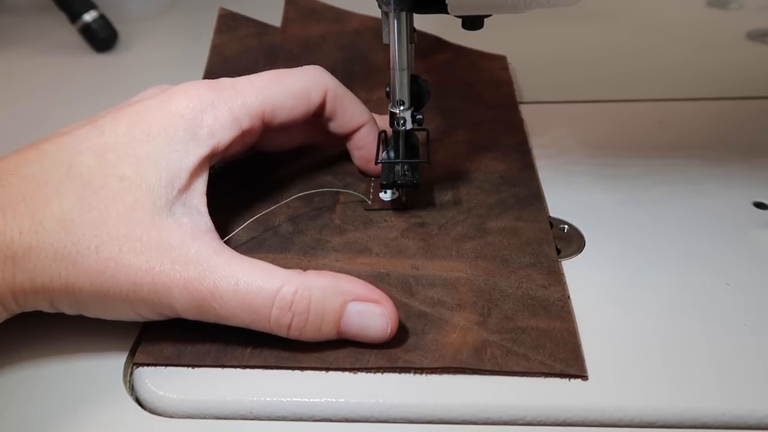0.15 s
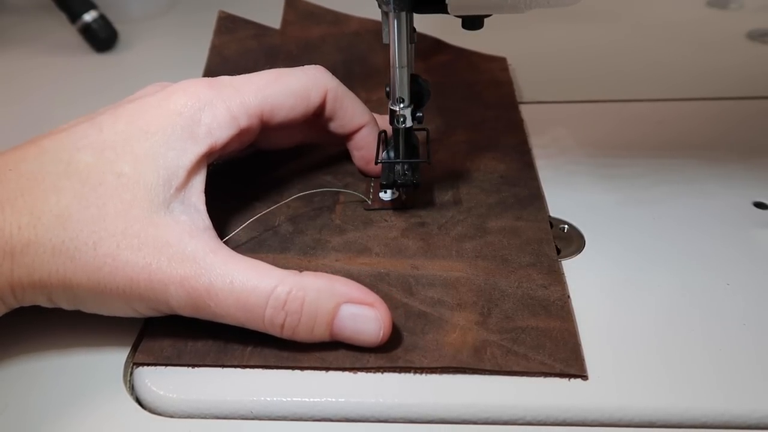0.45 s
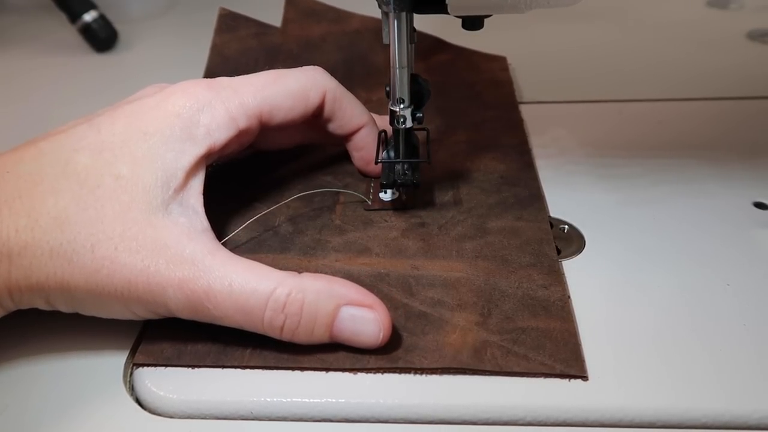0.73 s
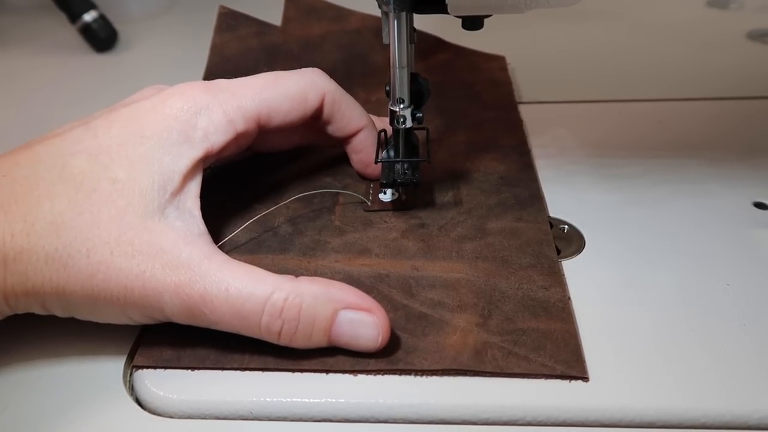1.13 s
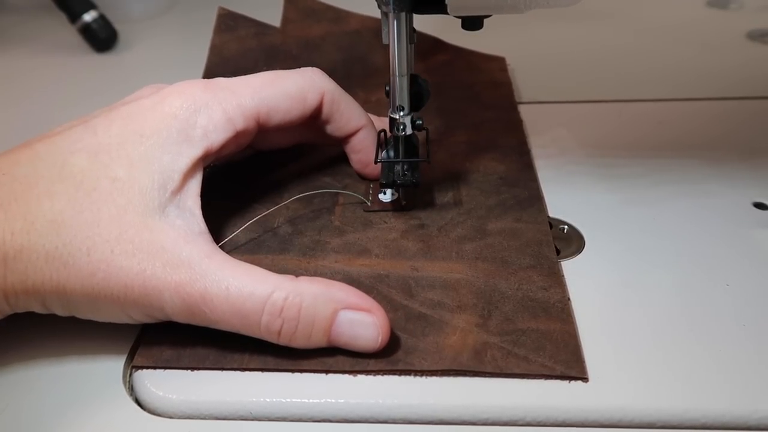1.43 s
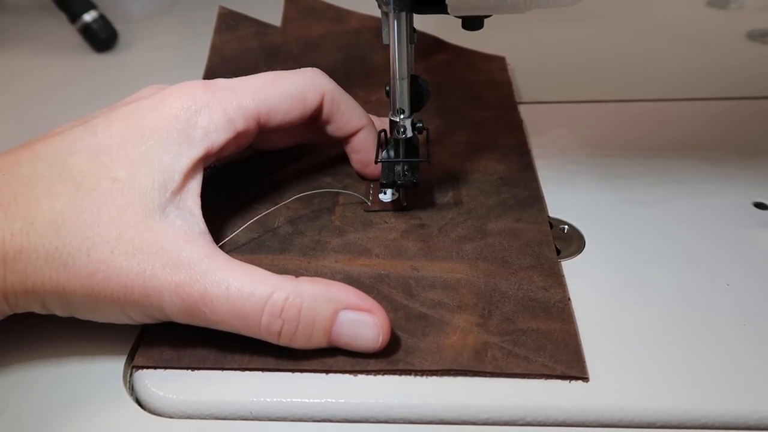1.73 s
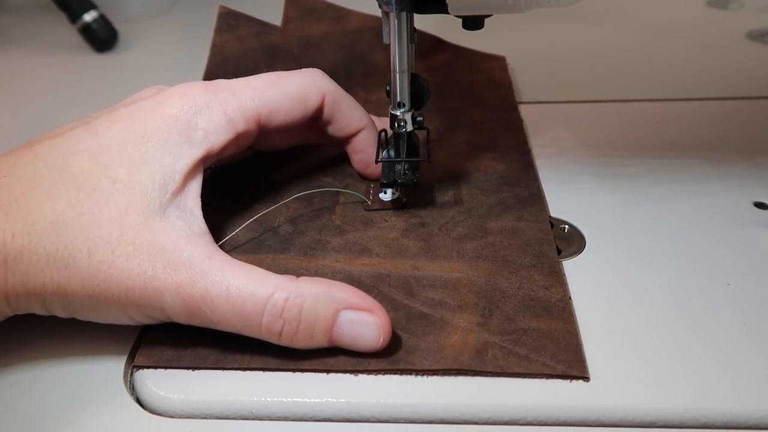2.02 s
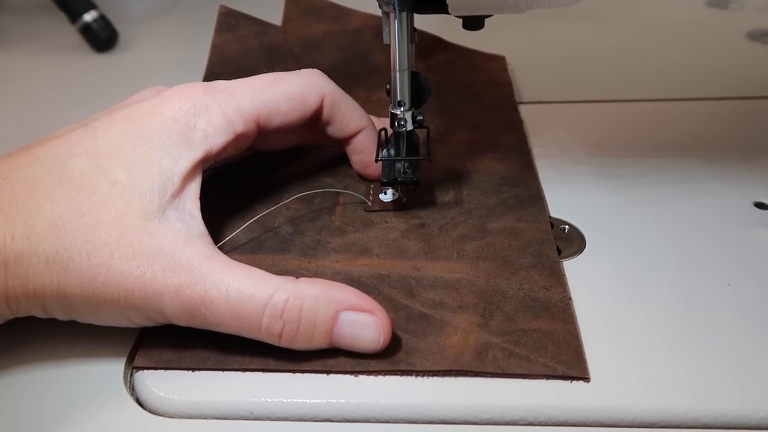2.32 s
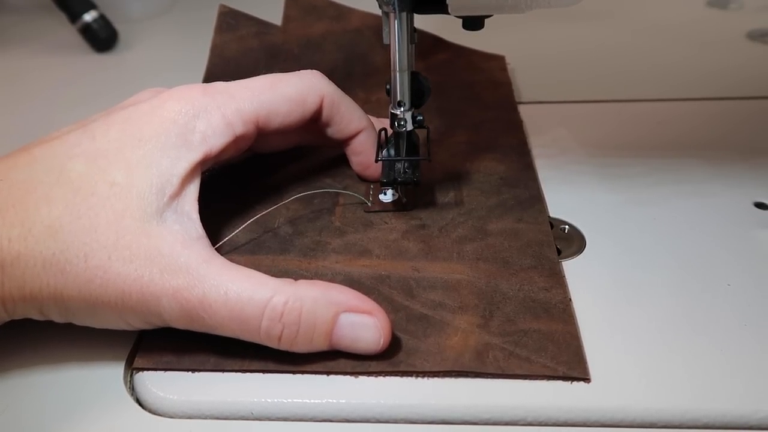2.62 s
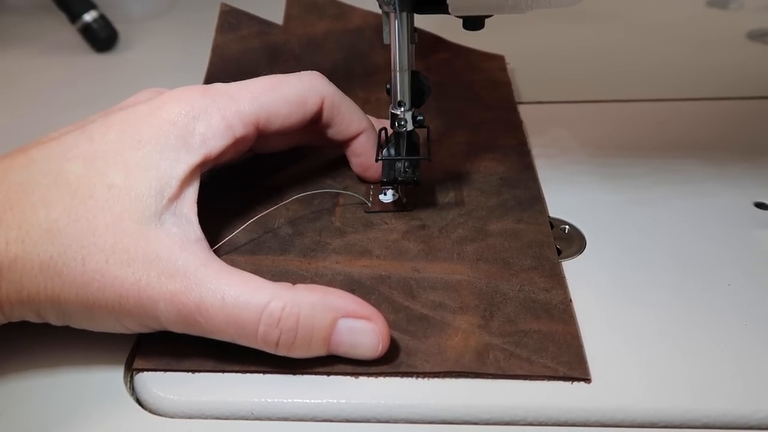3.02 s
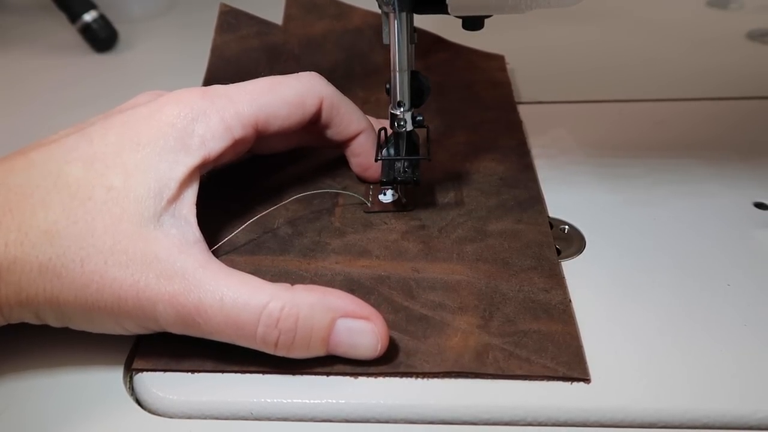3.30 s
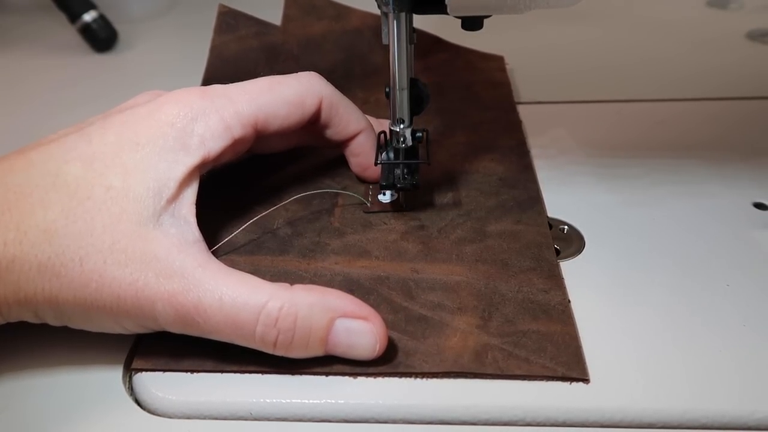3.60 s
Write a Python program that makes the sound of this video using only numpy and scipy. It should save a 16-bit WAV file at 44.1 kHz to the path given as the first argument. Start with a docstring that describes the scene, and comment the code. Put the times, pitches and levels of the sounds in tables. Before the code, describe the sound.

A sewing machine inches through leather with metallic ticks, dull knocks and a creak, motor starting at the end

```python
"""A small room, where an industrial sewing machine inches through leather on its table.
The drive nudges in short knocks, the linkage ticks, the needle bar and foot clunk, and a joint creaks and slips.
Every blow is a click played through colored pulses, decaying modes and noise tails; rubbing is shaped noise.
At the end the motor swells into a steady tone with rough friction. A faint hum and rumble lie underneath."""
import sys
import numpy as np
from scipy import signal
from scipy.fft import rfft, irfft
from scipy.io import wavfile

SR = 44100
rng = np.random.default_rng(int(sys.argv[2]) if len(sys.argv) > 2 else 0)


def put_to_file(sound):
    """Save the sound as 16-bit audio at rate SR, in the file named by the first command-line argument."""
    columns = np.atleast_2d(sound).T  # one column per channel
    safe = np.clip(columns, -1, 1)
    whole_steps = np.round(safe * 32767)
    wavfile.write(sys.argv[1], SR, whole_steps.astype(np.int16))


N = 165375
T = np.arange(N) / SR

# Ring of the links, struck by ticks and rubbed by the feed.
# Each row: frequency in Hz, level in dB, decay time t60 in seconds.
LINK_MODES = [(2670, -15, 0.025), (3600, -32.5, 0.34), (7960, -30, 0.047)]


def amp(db):
    """Decibels to gain."""
    return 10 ** (np.asarray(db) / 20)


def clicks(times, db):
    """Single-sample blows at the given times in seconds."""
    out = np.zeros(N)
    index = np.clip(np.round(np.asarray(times) * SR).astype(int), 0, N - 1)
    np.add.at(out, index, amp(db))
    return out


def through(x, response):
    """Play a signal through an impulse response."""
    return signal.fftconvolve(x, response)[:N]


def low_pass(x, hz):
    """Gentle second-order low-pass."""
    sections = signal.butter(2, min(hz, SR / 2 - 1), fs=SR, output="sos")
    return signal.sosfilt(sections, x + 1e-18)  # the offset avoids denormals


def decay(t60, samples=SR):
    """Exponential fade that loses 60 dB in t60 seconds."""
    return np.exp(-np.log(1000) * T[:samples] / t60)


def ring(modes):
    """Response of decaying modes (Hz, dB, t60), alternating in sign."""
    out = np.zeros(SR)
    for k, (hz, db, t60) in enumerate(modes):
        out += (-1) ** k * amp(db) * decay(t60) * np.sin(2 * np.pi * hz * T[:SR])
    return out


def impact(spectrum, size=4096):
    """Minimum-phase pulse of a given color (Hz, dB), thinned below its first frequency, peak 1."""
    hz, db = np.transpose(spectrum)
    f = np.arange(size // 2 + 1) * SR / size + 1
    color = amp(np.interp(np.log(f), np.log(hz), db))
    bass_cut = f / np.hypot(f, hz[0])
    # Keeping only the first half of the cepstrum packs the energy at the start.
    cepstrum = irfft(np.log(color * bass_cut))
    cepstrum[size // 2:] = 0
    pulse = irfft(np.exp(2 * rfft(cepstrum)))
    return pulse / np.abs(pulse).max()


def tail(t60, db):
    """Dense dying ring of casting and room: noise with a soft onset and energy db."""
    noise = rng.standard_normal(SR) * decay(t60) * (1 - np.exp(-T[:SR] / 0.0017))
    return amp(db) * noise / np.sqrt(np.sum(noise ** 2))


def contact(x, spectrum, t60, tail_db):
    """Blows heard as a short crack and its duller, diffuse tail."""
    direct = through(x, impact(spectrum))
    diffuse = through(direct, tail(t60, tail_db))
    return direct + low_pass(diffuse, hz=6000)


def grit(blows, t60, db):
    """Each blow crumbles into its own short burst of micro-contacts, with energy db."""
    envelope = decay(t60, SR // 4)
    burst = through(blows, envelope / np.sqrt(np.sum(envelope ** 2)))
    return amp(db) * rng.standard_normal(N) * burst


def background():
    """Colored noise for room rumble and hiss, a faint wavering hum, and a ring dying away from the outset."""
    # Color of the room noise. Each row: frequency in Hz, relative level in dB.
    floor_color = [(20, 5), (45, -5), (80, -12), (150, -17.5), (250, -17.5), (350, -21.5), (600, -30),
                   (1200, -33), (4000, -36.5), (8000, -39), (15500, -39.5)]
    # Hum partials. Each row: frequency in Hz, mean level in dB.
    hum_partials = [(59.5, -66.5), (135, -76.5)]
    # Ring at the outset. Each row: frequency in Hz, level in dB, decay time t60 in seconds.
    after_ring = [(135, -66, .8), (608, -69, .8)]
    floor_db, hum_waver_db = -63, 2.5

    # An extra second lets the filter settle before the part that is kept.
    noise = signal.fftconvolve(rng.standard_normal(N + SR), impact(floor_color, size=16384))[SR:SR + N]
    room = amp(floor_db) * noise / noise.std()
    waver = np.interp(T, np.linspace(0, T[-1], 20), rng.standard_normal(20))
    hum = sum(amp(db) * np.sin(2 * np.pi * hz * T) for hz, db in hum_partials)
    return room + hum * amp(hum_waver_db * waver) + through(clicks([0], [0]), ring(after_ring))


def thuds():
    """Soft, low bumps of the table: dulled clicks ring its low modes."""
    # Bumps. Each row: time in seconds, blow level in dB.
    bumps = [(1.551, -43.5), (2.222, -45), (2.619, -45), (2.783, -47), (3.325, -48.5)]
    # Their ring. Each row: frequency in Hz, level in dB, decay time t60 in seconds.
    thud_modes = [(38.7, 1, .16), (73, 2, 0.046), (101, -7.5, 0.086), (131, -8.5, 0.23)]
    return through(low_pass(clicks(*np.transpose(bumps)), hz=175), ring(thud_modes))


def rubbing():
    """Faint, uneven friction that swells and fades with each movement of the feed and keeps the links ringing."""
    # Leather and thread rub as the feed moves. Each row: start in seconds, length in seconds, peak level in dB.
    rubs = [(0.206, 0.42, -70.5), (1.36, 0.34, -67), (2.059, 0.16, -65.5), (2.558, 0.34, -79),
            (3.451, 0.43, -63.5)]
    # Color of the rubbing. Each row: frequency in Hz, relative level in dB.
    rub_color = [(250, 6.5), (600, 1.5), (1100, -6.5), (2600, -12), (3200, -5.5), (3650, -5), (4300, -14),
                 (8000, -20), (16000, -25)]
    rough_db, ring_db = 0.5, -9.5

    level = np.zeros(N)
    for start, length, db in rubs:
        progress = np.clip((T - start) / length, 0, 1)
        level += amp(db) * np.sqrt(np.abs(np.sin(np.pi * progress)))
    noise = through(rng.standard_normal(N), impact(rub_color))
    rough = low_pass(rng.standard_normal(N), hz=89.5)
    rub = level * amp(rough_db * rough / rough.std()) * noise / noise.std()
    return rub + amp(ring_db) * through(rub, ring(LINK_MODES))


def ticks():
    """Play in the linkage is taken up in small metallic ticks, and once in a bright snap."""
    # Linkage ticks. Each row: time in seconds, blow level in dB, high ping blow in dB.
    tick_events = [(0.208, -56.5, -70), (.219, -52.5, -75), (0.265, -51.5, -76), (0.292, -49, -75),
                   (.314, -48.5, -56.5), (0.3834, -51.5, -82), (0.4098, -48, -63), (0.474, -46.5, -76),
                   (0.484, -48, -53), (0.498, -43, -55), (1.377, -59.5, -83), (1.4467, -46.5, -79),
                   (1.525, -41.5, -75), (2.067, -49.5, -96), (2.913, -52, -87), (2.953, -51.5, -87),
                   (3.417, -47, -62), (3.4696, -46, -67), (3.601, -41, -59)]
    # Color of a tick. Each row: frequency in Hz, relative level in dB.
    tick_color = [(200, 5), (600, 5), (1100, -8), (1600, -0.5), (2100, -6), (2650, 7), (3150, -6),
                  (3700, 3), (4200, -8), (4900, -4.5), (5800, -13.5), (9000, -30.5), (16000, -32)]
    # Ring of a small spring. Each row: frequency in Hz, level in dB, decay time t60 in seconds.
    spring_modes = [(3690, -5.5, 0.1), (6270, -16.5, 0.073), (6620, -3.5, 0.023), (8440, -21, 0.054)]
    # Ring of the metal snap. Each row: frequency in Hz, level in dB, decay time t60 in seconds.
    snap_modes = [(5290, -1.5, 0.015), (9000, -11, 0.013), (10360, -8, 0.013), (11450, -15.5, 0.038),
                  (12700, -16, 0.014), (15600, -8, 0.015)]

    s, db, ping_db = np.transpose(tick_events)
    blows = clicks(s, db)
    body = contact(grit(blows, t60=0.022, db=6.5), tick_color, t60=0.2, tail_db=-1.5)
    links = through(blows, ring(LINK_MODES))
    pings = through(clicks(s, ping_db), ring(spring_modes))
    snap = clicks([3.593], [-42])
    snap = snap + grit(snap, t60=0.047, db=-2.0)
    return body + links + pings + through(snap, ring(snap_modes))


def creak():
    """A short run of uneven, gritty slips rings the metalwork; duller single slips come at other times."""
    # Single slips of the joint. Each row: time in seconds, rasp blow in dB, brightness in Hz, ring blow in dB.
    single_slips = [(.301, -46, 1400, -66), (.309, -51.5, 1400, -69), (2.187, -45, 950, -59),
                    (2.197, -44, 846, -56), (2.219, -43, 650, -61), (3.527, -51, 1600, -48),
                    (3.5456, -44.5, 1800, -44.5), (3.554, -46, 1490, -47)]
    # Metalwork. Each row: frequency in Hz, level in dB, decay time t60 in seconds.
    creak_modes = [(313, -7, 0.3), (477, -6, 0.28), (686, -10, 0.32), (780, -9.5, 0.15), (979, -8, 0.29),
                   (1192, -2.5, 0.2), (1281, 1, 0.14), (1680, -3, 0.062), (1845, -7.5, 0.042),
                   (2310, -4, 0.08), (3800, -18, 0.039), (4170, -9, 0.083), (4890, -11, 0.069)]
    # Color of the rasp. Each row: frequency in Hz, relative level in dB.
    rasp_color = [(120, 10), (600, 0), (1300, -2.5), (1900, -7), (2550, -13), (3600, -3.5), (4900, -15.5),
                  (5800, -23), (7200, -18.5), (10000, -38)]
    start_s, length_s, blow_db = 1.6165, .094, -47.5
    slips_per_s, jitter_periods, spread_db = 93, .05, 0.5
    crack_db, rasp_db, rasp_t60 = 4, 10, 0.039

    after = (np.arange(20) + jitter_periods * rng.standard_normal(20)) / slips_per_s
    # The first slips are up to 3 dB softer.
    strengths = blow_db - 3 * np.exp(-after / 0.022) + spread_db * rng.standard_normal(20)
    slipping = after < length_s
    slips = clicks(start_s + after[slipping], strengths[slipping])
    rasp = amp(crack_db) * slips + grit(slips, rasp_t60, rasp_db)
    for s, db, bright_hz, ring_db in single_slips:
        slips = slips + low_pass(clicks([s], [ring_db]), bright_hz)
        rasp = rasp + low_pass(grit(clicks([s], [db]), rasp_t60, rasp_db), bright_hz)
    return through(slips, ring(creak_modes)) * amp(-5.5) + contact(rasp, rasp_color, t60=0.25, tail_db=-3)


def clunks():
    """A main blow rings the head while needle bar and foot chatter for a moment, then rattle to rest."""
    # Clunks. Each row: time in seconds, blow level in dB, chatter in seconds, brightness in Hz, head blow in dB.
    clunk_events = [(.502, -35, 0.019, 4400, -39), (1.4667, -36, 0.02, 4340, -41),
                    (2.081, -41.5, 0.018, 3900, -43), (3.536, -40, 0.019, 5150, -38.5)]
    # Color of the chatter. Each row: frequency in Hz, relative level in dB.
    chatter_color = [(90, 2), (170, 17.5), (300, 10), (500, 2), (1100, -9.5), (1450, -8.5), (1900, -1.5),
                     (2800, -7.5), (4000, -8.5), (6000, -19), (10000, -10.5), (16000, -54)]
    # Needle bar and foot. Each row: frequency in Hz, relative level in dB, decay time t60 in seconds.
    bar_modes = [(691, -5, 0.11), (913, -8.5, 0.13), (1098, -3.5, 0.047), (1279, -9, 0.081),
                 (1667, -6, 0.057), (1764, -4, 0.047), (2034, -18.5, 0.07), (2300, -5, 0.046),
                 (2720, -1.5, 0.032), (3070, -3.5, 0.033)]
    # Machine head. Each row: frequency in Hz, level in dB, decay time t60 in seconds.
    head_modes = [(112.6, -9, 0.32), (146, -3, .12), (174, -0.5, 0.13), (213, -14.5, 0.31),
                  (301, -24, 0.27), (352, -14.5, 0.37), (484, -18, 0.19), (564, -16, 0.36),
                  (684, -19.5, 0.21), (924, -16, 0.21)]
    contacts_per_s, first_blow_db, chatter_db = 400, 3.5, -1.5
    rattle_per_s, rattle_db, rattle_fade_db_per_s = 90, -10, 125

    chatter, blows = np.zeros((2, N))
    for s, db, length, bright_hz, head_db in clunk_events:
        wobble, size, sign, late = rng.random((4, 20))
        after = (np.arange(20) + wobble - wobble[0]) / contacts_per_s
        # Contacts vary by 3 dB either way and fade fast once the chatter length is over.
        fade_db = 60 * np.maximum(after / length - 1, 0)
        strengths = db + chatter_db + 6 * (size - .5) - fade_db
        strengths[0] = db + first_blow_db
        up = sign > .5  # contacts push either way at random
        run = clicks(s + after[up], strengths[up]) - clicks(s + after[~up], strengths[~up])
        settling = (np.arange(20) + late) / rattle_per_s
        rattle_levels = db + rattle_db - rattle_fade_db_per_s * settling
        run = run + clicks(s + length + settling, rattle_levels)
        chatter += low_pass(run, bright_hz)
        blows += clicks([s], [head_db])
    body = contact(chatter, chatter_color, t60=0.33, tail_db=-0.5)
    bar = amp(-14) * through(chatter, ring(bar_modes))
    return body + bar + through(blows, ring(head_modes))


def motor():
    """The motor swells into a steady sum of harmonics, with rough friction that throbs twice a cycle."""
    # Harmonics of the turning motor. Each row: multiple of the turning rate, relative level in dB.
    orders = [(1, 0), (2, -2), (3, -25), (4, -19), (5, -19), (6, -25), (7, -22)]
    # Color of the drive's gritty friction. Each row: frequency in Hz, relative level in dB.
    grind_color = [(150, 13.5), (450, 5), (750, 1.5), (1000, -4.5), (1600, -3), (2600, -2.5), (3700, -4.5),
                   (4500, -19), (6500, -29), (16000, -46)]
    start_s, rise_s, turn_hz = 3.657, .085, 116.5
    hum_db, hum_swell_db = -34.5, 15
    grind_db, grind_swell_db, throb_db = -46.5, 15.5, 2

    rise = np.minimum((T - start_s) / rise_s, 1)
    gate = np.clip(10 * rise, 0, 1)  # silent before the start, open after a tenth of the rise
    turn = 2 * np.pi * turn_hz * (T - start_s)
    hum = sum(amp(db) * np.cos(multiple * turn) for multiple, db in orders)
    hum = hum * amp(hum_db + hum_swell_db * (rise - 1))
    grind = through(rng.standard_normal(N), impact(grind_color))
    grind_level = amp(grind_db + grind_swell_db * (rise - 1) + throb_db * np.cos(2 * turn))
    return gate * (hum + grind / grind.std() * grind_level)


def knocks():
    """Each nudge of the drive cracks, rings briefly, booms in the table and rocks the stand."""
    # Drive knocks. Each row: time in seconds, crack blow in dB before the mix, table boom blow in dB.
    nudges = [(.791, -33.5, -46), (0.8154, -46.5, -46), (1.0726, -30, -42.5), (1.104, -39.5, -53.5),
              (2.2695, -32.5, -46), (2.3027, -38.5, -48), (2.3283, -37, -48.5), (2.349, -37.5, -44.5),
              (2.368, -33.5, -46.5), (2.388, -39, -44.5), (3.138, -26, -39.5), (3.1696, -33.5, -53.5),
              (3.601, -38.5, -50)]
    # Color of the crack. Each row: frequency in Hz, relative level in dB.
    crack_color = [(100, -1), (450, 0), (750, -5.5), (1100, -15), (1650, -3), (2250, -14), (2950, -6),
                   (3550, -11), (4300, -20.5), (5300, -31), (6700, -22.5), (9000, -38), (16000, -43)]
    # Metallic ring of the drive, the same in every knock.
    # Each row: frequency in Hz, relative level in dB, decay time t60 in seconds.
    drive_modes = [(1572, -20, 0.052), (1854, -16, 0.034), (2520, -24, 0.069), (2926, -11, 0.017),
                   (3545, -7, 0.019), (3850, -18, 0.034), (4180, -15, 0.013)]
    # Table and motor mount. Each row: frequency in Hz, level in dB, decay time t60 in seconds.
    table_modes = [(92.9, -9.5, 0.33), (118.5, -2, 0.2), (134.1, -11, 1), (206.4, 4, 0.24), (225, 0, 0.24),
                   (253.6, -11, 0.3), (312, -21, 0.08), (395.5, -17.5, 0.35), (477.5, -19.5, 0.32),
                   (562, -16, 0.23), (655, -12.5, 0.048), (812.6, -20.5, 0.28)]
    stand_mode = (41.65, -8.5, 1)  # Hz, dB, t60 in seconds

    s, crack_db, boom_db = np.transpose(nudges)
    blows = clicks(s, crack_db)
    metal = through(blows, ring(drive_modes))
    metal = metal + through(metal, tail(t60=0.06, db=-27))
    gritty = amp(-8.5) * blows + grit(blows, t60=0.055, db=1)
    crack = contact(gritty, crack_color, t60=0.22, tail_db=-3)
    boom = through(clicks(s, boom_db), ring(list(table_modes) + [stand_mode]))
    return amp(-4.5) * (crack + metal) + boom


def scene():
    """The room and all parts of the machine, summed to one channel."""
    machine = thuds() + rubbing() + ticks() + creak() + clunks() + motor() + knocks()
    return (background() + machine)[None]


def record(dry):
    """A tenth-order elliptic low-pass cuts the top steeply."""
    return signal.sosfilt(signal.ellip(10, .2, 70, 15900, fs=SR, output="sos"), dry)


dry = scene()
out = record(dry)
put_to_file(out)
```